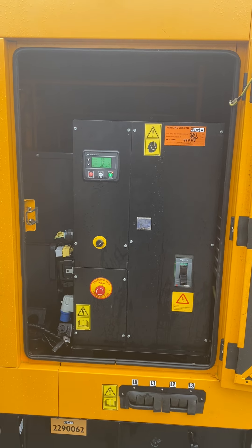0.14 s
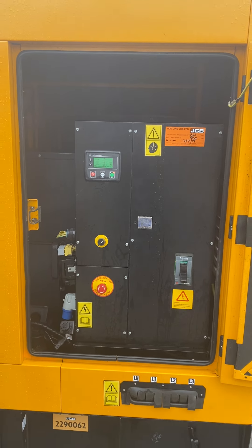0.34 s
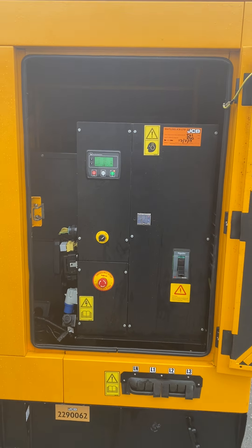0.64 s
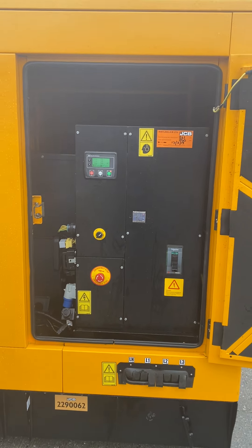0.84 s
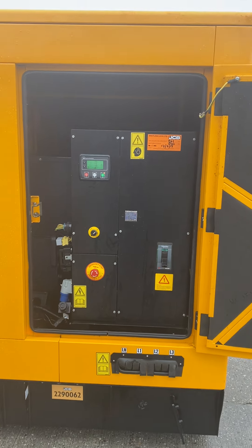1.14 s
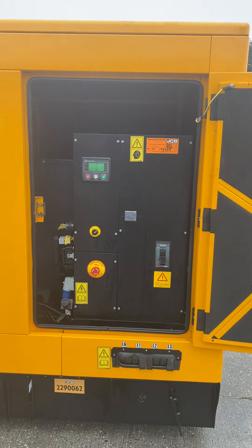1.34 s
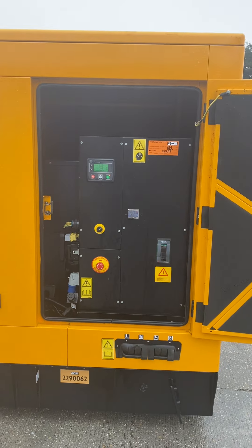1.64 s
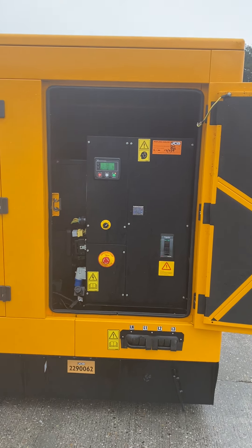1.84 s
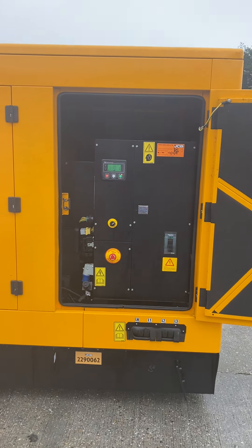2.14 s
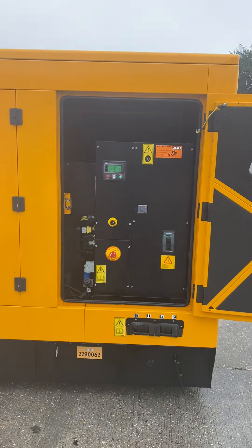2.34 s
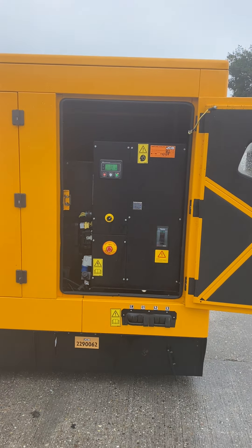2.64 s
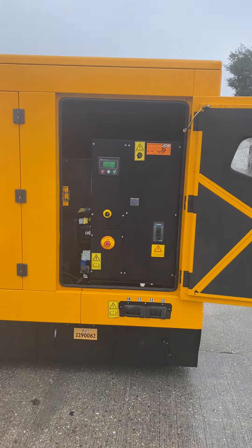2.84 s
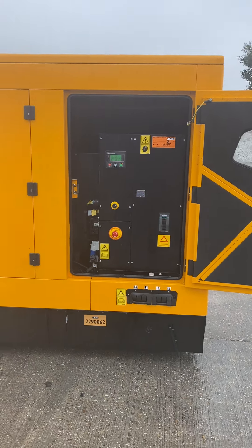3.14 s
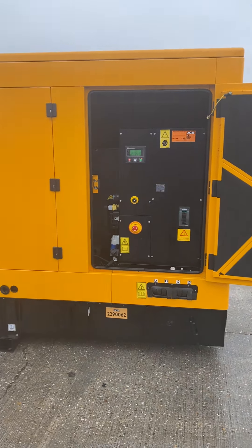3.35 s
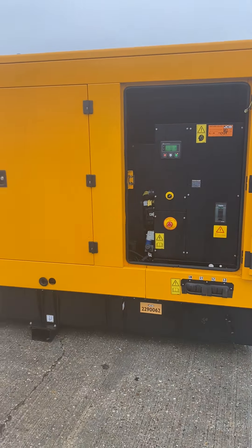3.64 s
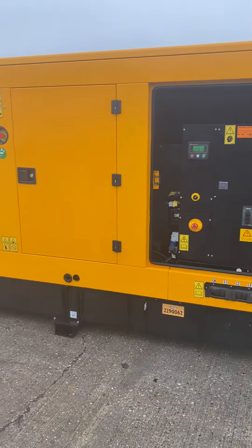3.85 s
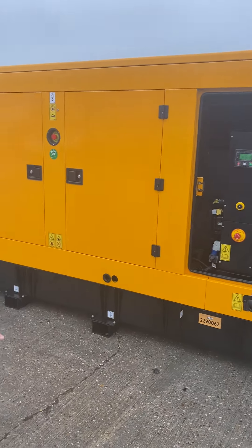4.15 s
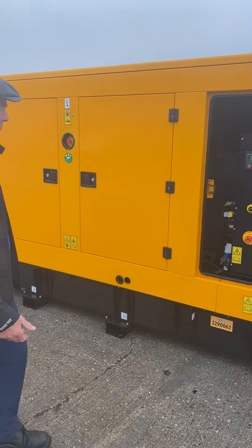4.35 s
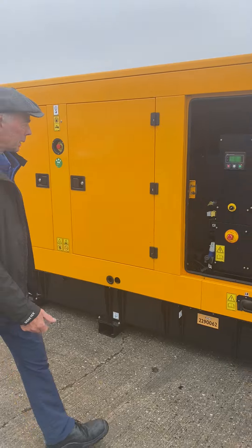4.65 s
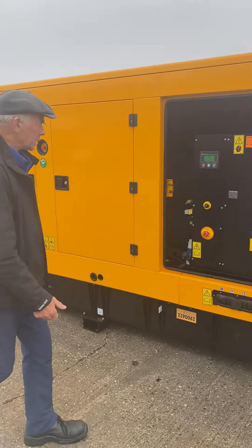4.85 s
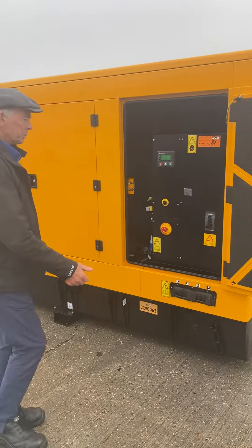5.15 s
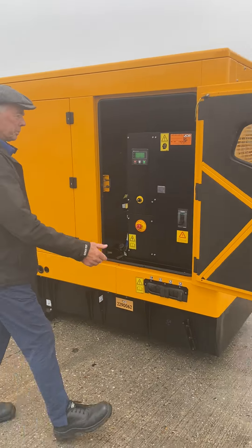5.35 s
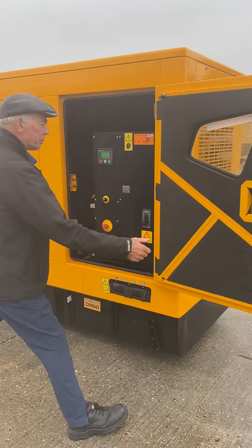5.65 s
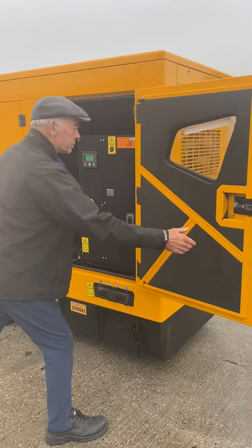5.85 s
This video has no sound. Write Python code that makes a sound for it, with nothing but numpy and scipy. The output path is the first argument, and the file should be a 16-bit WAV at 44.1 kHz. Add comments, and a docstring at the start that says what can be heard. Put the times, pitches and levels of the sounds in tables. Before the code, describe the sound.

A large diesel generator, just started, throbs, clatters and rings in its steel cabinet, then runs steadily and softens as the microphone backs away.

```python
"""A six-cylinder diesel generator, just fired up in its steel enclosure, throbs a few times and settles near 1500 rpm.
Cycle-repeating noise impacts make the injector and valve clatter; firing blows ring narrow cabinet bands.
Sine lines make the exhaust and fan hum and singing panels; shaped noise makes the air, hiss and turbo whistle.
The phone, held close at the open service door, backs about 2 m into the yard and moves sideways.
Decaying sines make a few dull handling knocks; short noise swells make the brushes and puffs."""
import sys
import numpy as np
from scipy import signal
from scipy.fft import rfft, irfft
from scipy.io import wavfile
from scipy.ndimage import uniform_filter1d

SR = 44100
rng = np.random.default_rng(int(sys.argv[2]) if len(sys.argv) > 2 else 0)


def waveform_to_disk(signal):
    """Save audio, clipped to [-1, 1], as 16-bit WAV at the path in sys.argv[1]."""
    frames = np.transpose(np.atleast_2d(signal))
    scaled = np.clip(frames, -1, 1) * 32767
    samples = np.round(scaled).astype(np.int16)
    wavfile.write(sys.argv[1], SR, samples)


N = 265041
TIME_S = np.arange(N) / SR
FREQ_HZ = np.maximum(np.arange(N // 2 + 1) * SR / N, 1)
LEFT_RIGHT = np.array([[1], [-1]])  # signs of the two microphone ports

# Engine: mean firing rate; a four-stroke cycle holds one firing of each cylinder
FIRING_HZ, CYLINDERS = 74.95, 6
# Relative knock of each cylinder in firing order: [level_db]
CYLINDER_DB = [4, -1.5, 3, 4, 0, -1]
# Throbs after the start: [peak_s, cabinet_gain_db, clatter_gain_db]; half-length to 1/e
SURGES = [(.052, 5, 5.5), (.207, 7.5, 5), (0.37, 6.5, 4), (0.531, 6, 2.5)]
SURGE_S = 0.028
# Share of the impacts that repeats every cycle (0-1), and how fast it grows
REPEAT_START, REPEAT_SETTLED, SETTLE_S = 0.05, 0.71, 0.7

# Walk from the service door: [time_s, back_m, side_m], side along the housing
WALK = [(0, 0, 0.34), (.5, 0.27, 0), (1.5, 0.58, 0.21), (2.2, 1.23, 0.74), (3.3, 1.83, 0),
        (4.2, 1.943, 0.16), (4.95, 2.03, 0.46), (5.4, 1.925, 1.04), (6, 2, 1.56)]
# Distance back where door sound gives way to yard sound, and the softness of that edge
YARD_FROM_M, YARD_EDGE_M = 1.394, 0.088

# Clatter spectrum at the door and in the yard, relative: [freq_hz, density_db_per_hz]
CLATTER_DOOR = [(500, -46), (950, 1.5), (1130, 1.5), (1230, -1.5), (1520, 0), (2050, 2), (2400, -8.5),
                (3000, -12), (3900, -10.5), (5000, -20.5), (7500, -21.5), (12000, -93)]
CLATTER_YARD = [(500, -36.5), (950, 4.5), (1200, 2.5), (1400, 2.5), (1900, 5), (2600, -2.5), (3400, -5),
                (3900, -5), (4900, -16), (6800, -11), (8500, -31), (12000, -107)]
# Engine cover modes against the clatter: [freq_hz, width_hz, door_db, yard_db]
COVERS = [(1555, 67, -6, -14.5), (2580, 39, 2, -17), (3240, 46, -11, -13), (3730, 340, -8.5, -33)]
# Scattered part of the clatter, different at the two ports: [freq_hz, share_0_to_1]
CLATTER_SCATTER = [(1200, .1), (2000, .19), (3500, .26)]
# Shading of the ports by the phone's body: [freq_hz, left_minus_right_db]
CLATTER_SHADE = [(1100, 1.6), (2000, 0.8), (4000, -0.5)]
# Clatter level over distance: [door_db, back_loss_db_per_m, yard_db, side_loss_db_per_m]
CLATTER_LEVEL = (-28.5, 12, -32.5, 4.6)
# Clatter left minus right: [door_db, back_loss_db_per_m, yard_db, side_loss_db_per_m]
CLATTER_PAN = (.3, .3, 2.2, 0.92)

# Cabinet modes, relative before the broad band shape: [freq_hz, width_hz, door_db, yard_db]
CABINET = [(794, 84, -0.5, -6.5), (849, 124, 4.5, 1), (1000, 76, -57, -12)]
# Cabinet level over distance: [door_db, back_loss_db_per_m, yard_db, side_loss_db_per_m]
CABINET_LEVEL = (-29.1, 6, -34.2, 3.9)
# Cabinet left minus right: [door_db, back_loss_db_per_m, yard_db, side_loss_db_per_m]
CABINET_PAN = (5, -1, 7.5, -0.5)
# Ground spot that changes the cabinet level around it: [back_m, side_m, width_m, gain_db]
RING_SPOT = (-3.7, 3.5, 2.5, -6)
# Left port's lead in the cabinet ring: at the door, and added well along the side in the yard
DOOR_TURN_RAD, SIDE_TURN_RAD = 0.14, 1
# Singing panels near the door, pitch taken to the nearest cycle multiple:
# [pitch_hz, peak_s, half_length_s, level_db]
PANELS_DOOR = [(749.4, 0.88, 0.5, -35.5), (766, 0.96, 0.25, -39), (738, 1.95, .4, -41),
               (812, 1.4, 1.2, -41), (825, .9, .7, -42), (852.5, 1.15, 0.7, -39.5), (848, 2.26, .3, -36.5),
               (875, 1.7, .9, -42)]
# Singing panels in the yard, pitch as above, relative: [pitch_hz, level_db]
PANELS_YARD = [(775, -4), (850, 5), (1000, -0.5), (1175, -3), (1275, -7), (1537.5, -0.5), (1575, -4.5),
               (1612.5, -6.5), (1687.5, -1.5), (1787.5, -8.5), (2337.5, -5)]
# Hard combustion knocks clanging the cabinet: [start_s, peak_db]
CLANGS = [(.047, -17), (.198, -24), (.228, -23), (.366, -24), (.686, -22), (.766, -31), (.999, -23),
          (1.079, -18), (1.319, -23.5), (1.356, -26), (1.4, -23), (1.867, -24), (1.978, -23), (2.261, -26)]
CLANG_HZ, CLANG_RISE_S, CLANG_DECAY_S = 811, 0.0051, 0.0034  # mean pitch, time constants
# Buzzing covers and ducts: [freq_hz, width_hz, peak_s, half_length_s, level_db]
BUZZES = [(350, 64, 0.082, 0.44, -38), (2607, 100, 0.11, 0.35, -41.5), (2600, 26, 1.3, 0.75, -51.5),
          (284, 38, 1.28, 0.23, -42.5), (1546, 59, 1.5, 0.33, -40), (1785, 320, 2.2, 0.88, -45.5),
          (635, 63, 3.34, 0.8, -44.5), (2970, 200, 4.5, 0.5, -46), (3310, 170, 5.06, 0.74, -47),
          (1850, 800, 4.9, .7, -40.5), (1598, 150, 5.6, 0.7, -44.5)]

# Exhaust and fan lines, pitch taken to the nearest cycle multiple, relative: [pitch_hz, level_db]
HUM = [(62.5, -10.5), (75, 1.5), (87.5, -6), (125, -10), (150, -11.5), (225, -18), (300, -17), (337.5, -16),
       (350, -8)]
# Hum booming and thinning along the walk: [time_s, level_db]
HUM_LEVEL = [(0, -47), (.25, -44), (1, -44.5), (1.4, -44), (2.3, -51), (2.7, -38), (3.05, -34),
             (3.5, -32.5), (3.8, -38.5), (4.15, -34.5), (4.5, -37), (5.2, -39), (5.55, -42.5), (5.9, -39.5)]
# Cooling-air spectrum at the door and in the yard, relative: [freq_hz, density_db_per_hz]
AIR_DOOR = [(25, -6), (55, 7.5), (100, 7.5), (220, 7), (340, 14), (420, 9), (500, -3), (680, 6.5),
            (1000, -91)]
AIR_YARD = [(25, -10), (55, 19), (105, 15), (200, 12.5), (340, 10), (470, 9.5), (600, 1), (750, 11),
            (1100, -73)]
# Air level over distance: [door_db, back_loss_db_per_m, yard_db, side_loss_db_per_m]
AIR_LEVEL = (-33, 12.5, -37.5, 4)
# Fan draught across the path: distance back, half-width to 1/e, peak level
DRAUGHT_M, DRAUGHT_WIDTH_M, DRAUGHT_DB = 1.637, 0.26, -31.5
# Turbocharger whistle along the walk: [time_s, level_db]
TURBO = [(0, -87), (2.5, -80), (2.8, -65), (3, -70), (3.3, -63.5), (4.05, -64.5), (4.4, -57.5), (4.8, -67),
         (5.2, -65), (6, -74)]
TURBO_HZ, TURBO_WIDTH_HZ = 5198, 38
# Hiss spectrum, relative: [freq_hz, density_db_per_hz]
HISS = [(3000, -25), (6500, -2), (9000, 1), (11000, -1), (12500, 3), (15500, 2.5)]
# Diffuse part of the hiss, different at the two ports: [freq_hz, share_0_to_1]
HISS_DIFFUSE = [(6500, .2), (8500, .004), (11300, .004), (12300, .3), (15500, .25)]
# Hiss level over distance: [door_db, back_loss_db_per_m, yard_db, side_loss_db_per_m]
HISS_LEVEL = (-47, 3.5, -52.5, -1)

# Knocks on the phone, levels before their envelopes: [start_s, ring_hz, ring_db, thud_db]
KNOCKS = [(3.856, 640, -7, -36), (3.864, 660, -18, -26), (4.0105, 735, -10, -30), (4.019, 625, -7, -25),
          (4.027, 726, -11.5, -29), (4.0363, 656, -9, -22), (4.129, 644, -19, -33), (4.142, 610, -14, -29),
          (4.1495, 630, -7.5, -17)]
KNOCK_GRIT_DB, KNOCK_TAIL_DB, KNOCK_TAIL_S = -14.5, -23, 0.0093  # levels against the ring
# Soft brushes and puffs on the phone: [peak_s, half_length_s, centre_hz, level_db]
SCUFFS = [(0.76, 0.0063, 13900, -53), (1.754, 0.03, 49.5, -41.5), (3.22, .15, 205, -35),
          (4.106, 0.11, 51, -43), (4.15, 0.02, 270, -32)]
# Microphone ports: right-port lag, band without lag, top cut
PORT_LAG_S, MONO_BELOW_HZ, TOP_HZ = 5.1e-5, 500, 15750


def clatter(cycle, place, repeat):
    """Injectors and valves ring the engine covers; part of it arrives scattered from the yard."""
    share = np.interp(FREQ_HZ, *np.transpose(CLATTER_SCATTER))
    direct = filtered(two_ports(rattle(cycle, repeat)), np.sqrt(1 - share))
    scattered = filtered(rng.standard_normal((2, N)), np.sqrt(share))
    ports = filtered(direct + scattered, shape(CLATTER_SHADE) ** (LEFT_RIGHT / 2))
    ports = ports * firings(cycle, decay=0.7, between=0.65) * undb(0.6 * walk(25))
    door_covers = sum(undb(db) * resonance(hz, width) for hz, width, db, _ in COVERS)
    yard_covers = sum(undb(db) * resonance(hz, width) for hz, width, _, db in COVERS)
    door = filtered(ports, shape(CLATTER_DOOR) * (1 + door_covers))
    yard = filtered(ports, shape(CLATTER_YARD) * (1 + yard_covers))
    return blend(unit(door), unit(yard), place)


def rattle(cycle, repeat, count=5):
    """A run of tiny impacts recurs every engine cycle, slowly changing, mixed with fresh ones."""
    size = int(SR * CYLINDERS / FIRING_HZ)
    patterns = rng.standard_normal((count, size))[:, (cycle % 1 * size).astype(int)]
    step = TIME_S / TIME_S[-1] * (count - 1)
    nearness = np.maximum(1 - abs(step - np.arange(count)[:, None]), 0)
    repeated = np.sum(patterns * np.sqrt(nearness), axis=0)
    return blend(rng.standard_normal(N), repeated, repeat)


def firings(cycle, decay, between):
    """Each cylinder's knock builds quickly and dies away over a steady level; decay is in firings."""
    count = cycle * CYLINDERS
    age = count % 1
    strength = undb(CYLINDER_DB)[count.astype(int) % CYLINDERS]
    return unit(between + strength * (1 - np.exp(-age / 0.22)) * np.exp(-age / decay))


def surges():
    """The first few throbs add decibels to the cabinet's ring and to the clatter."""
    peak_s, ring_db, clatter_db = np.transpose(SURGES)
    swells = passing(peak_s[:, None], SURGE_S)
    return ring_db @ swells, clatter_db @ swells


def cabinet(cycle, place, repeat):
    """Every firing rings the enclosure in a narrow band; in the yard its panels sing along."""
    drive = blend(rattle(cycle, repeat), strokes(cycle, repeat), .5)
    ports = drive + undb(-18.0) * LEFT_RIGHT * rattle(cycle, repeat)
    band = shape([(450, -27), (640, -20.5), (730, 13.0), (900, 4.5), (1400, -42.0)])
    door_modes = sum(undb(db) * abs(resonance(hz, width)) for hz, width, db, _ in CABINET)
    yard_modes = sum(undb(db) * abs(resonance(hz, width)) for hz, width, _, db in CABINET)
    door = unit(filtered(ports, band * door_modes))
    yard = unit(filtered(ports, band * yard_modes))
    panels = tones(cycle, PANELS_YARD, waver_db=2.0, spread=0.65)
    return blend(door, blend(yard, panels, 0.75 * repeat), place)


def strokes(cycle, repeat):
    """One block blow per firing; its timing scatter shrinks as the engine settles."""
    count = (cycle * CYLINDERS).astype(int)
    at = np.flatnonzero(np.diff(count))
    late, size_db = rng.standard_normal((len(at), 2)).T
    jitter_s = .0004 * (1 - repeat[at])
    hit = np.clip(at + (late * jitter_s * SR).astype(int), 0, N - 1)
    cylinder_db = .5 * np.array(CYLINDER_DB)[count[at] % CYLINDERS]  # half the knock's contrast
    out = np.zeros(N)
    out[hit] = undb(cylinder_db + size_db)
    return unit(out)


def door_panels(cycle):
    """Panel tones waver and take over from each other as the phone moves through standing waves."""
    out = 0
    for hz, peak_s, length_s, db in PANELS_DOOR:
        tone = tones(cycle, [(hz, 0)], waver_db=1.6, spread=0.2)
        out = out + tone * undb(db + 2.2 * walk(45)) * passing(peak_s, length_s)
    return out


def clangs():
    """Now and then a cold cylinder fires hard and the cabinet rings as a short decaying sine."""
    out = np.zeros(N)
    for start_s, db in CLANGS:
        age_s = np.maximum(TIME_S - start_s, 0)
        hz = CLANG_HZ * (1 + 0.022 * rng.standard_normal())
        envelope = (1 - np.exp(-age_s / CLANG_RISE_S)) ** 2 * np.exp(-age_s / CLANG_DECAY_S)
        out += undb(db) * envelope / envelope.max() * np.sin(2 * np.pi * hz * age_s)
    return out


def buzzes(cycle):
    """Loose covers and ducts chatter on every turn of the crankshaft, each in its own band."""
    turn = 2 * cycle % 1
    chatter = rattle(cycle, .55) * (.3 + np.exp(-turn / .2))
    out = 0
    for hz, width_hz, peak_s, length_s, db in BUZZES:
        buzz = unit(filtered(chatter, resonance(hz, width_hz) ** 2))
        out = out + buzz * undb(db) * passing(peak_s, length_s)
    return out


def hum(cycle):
    """Silenced exhaust and fan sound as lines on multiples of the engine cycle."""
    return tones(cycle, HUM, waver_db=1.0, spread=0) * undb(curves(HUM_LEVEL)[0])


def tones(cycle, rows, waver_db, spread):
    """Lines locked to the engine cycle waver in level; spread lets their phase drift between ports."""
    out = 0
    for hz, db in rows:
        multiple = np.round(hz * CYLINDERS / FIRING_HZ)
        phase = 2 * np.pi * (multiple * cycle + rng.random()) + spread * walk(0.79) * LEFT_RIGHT
        out = out + undb(db + waver_db * walk(4.29)) * np.sin(phase)
    return unit(out)


def cooling_air(cycle, place):
    """The fan's turbulent rush is low-frequency noise that partly repeats with the engine cycle."""
    flow = rattle(cycle, 0.23) * undb(0.2 * walk(11))
    door = unit(filtered(flow, shape(AIR_DOOR)))
    yard = unit(filtered(flow, shape(AIR_YARD)))
    return blend(door, yard, place)


def draught(back_m):
    """The cooling air roars for a moment where the phone passes through it."""
    roar = shape([(70, -28.5), (130, 5), (220, 10.5), (330, 12.5), (440, -2), (650, -88)])
    inside = np.exp(-((back_m - DRAUGHT_M) / DRAUGHT_WIDTH_M) ** 2)
    return unit(filtered(rng.standard_normal(N), roar)) * inside * undb(DRAUGHT_DB)


def turbo():
    """The turbocharger's thin, breathy whistle is narrow-band noise that comes and goes."""
    whistle = unit(filtered(rng.standard_normal(N), resonance(TURBO_HZ, TURBO_WIDTH_HZ) ** 2))
    return whistle * undb(curves(TURBO)[0])


def hiss(cycle):
    """Fine hiss pulses lightly with the firings, partly direct and partly diffuse."""
    share = np.interp(FREQ_HZ, *np.transpose(HISS_DIFFUSE))
    direct = lagged(filtered(rng.standard_normal(N), shape(HISS) * np.sqrt(1 - share)))
    diffuse = filtered(rng.standard_normal((2, N)), shape(HISS) * np.sqrt(share))
    return unit(direct + diffuse) * firings(cycle, decay=.4, between=1.3) * undb(1.1 * walk(23))


def handling():
    """Fingers knock the phone into a short gritty ring, faint tail and thud; brushes are noise swells."""
    out = np.zeros(N)
    grit = unit(filtered(rng.standard_normal(N), resonance(770, 310) ** 2))
    for start_s, hz, ring_db, thud_db in KNOCKS:
        age_s = np.maximum(TIME_S - start_s, 0)
        contact = np.exp(-age_s / .0022) - np.exp(-age_s / .0007)
        tone = np.sin(2 * np.pi * hz * age_s)
        ring = (tone + undb(KNOCK_GRIT_DB) * grit) * contact
        tail = undb(KNOCK_TAIL_DB) * tone * np.exp(-age_s / KNOCK_TAIL_S)
        thud = np.sin(2 * np.pi * 58 * age_s) * np.exp(-age_s / 0.0071)
        out += undb(ring_db) * (ring + tail) + undb(thud_db) * thud
    for peak_s, length_s, hz, db in SCUFFS:
        rub = unit(filtered(rng.standard_normal(N), resonance(hz, hz / 2) ** 2))
        out += rub * undb(db) * passing(peak_s, length_s)
    return out


def two_ports(x, count=7):
    """Reflections off doors and ground colour each port differently at every step of the walk."""
    knots_hz = np.arange(0, SR / 2, 170)
    depth = np.interp(knots_hz, [600, 1500, 3400, 5000], [.1, .35, .5, .25])

    def port_curves():
        draws = depth * rng.standard_normal((2, len(knots_hz)))
        return np.array([np.interp(FREQ_HZ, knots_hz, draw) for draw in draws])

    spectrum, out = rfft(lagged(x)), 0
    for step in range(count):
        turn, ripple = port_curves(), port_curves()
        nearness = np.maximum(1 - abs(TIME_S / TIME_S[-1] * (count - 1) - step), 0)
        out = out + nearness * irfft(spectrum * np.exp(.5 * ripple + 1j * turn), N)
    return out


def lagged(x):
    """Direct sound reaches the right port a moment after the left; the bass has no lag."""
    lag_s = PORT_LAG_S * (FREQ_HZ > MONO_BELOW_HZ)
    return filtered(x, np.exp(1j * np.pi * FREQ_HZ * lag_s * LEFT_RIGHT))


def turned(x, radians):
    """Let the left port lead the right by a changing phase."""
    return np.real(signal.hilbert(x) * np.exp(.5j * radians * LEFT_RIGHT))


def along_walk(rule, back_m, side_m, place):
    """Decibels follow distance back at the door, then distance sideways in the yard."""
    door_db, back_db_per_m, yard_db, side_db_per_m = rule
    return (1 - place) * (door_db - back_db_per_m * back_m) + place * (yard_db - side_db_per_m * side_m)


def spot(back_m, side_m, rule):
    """Decibels added, or taken away if negative, around one spot on the ground."""
    at_back_m, at_side_m, width_m, db = rule
    distance_squared = (back_m - at_back_m) ** 2 + (side_m - at_side_m) ** 2
    return db * np.exp(-distance_squared / width_m ** 2)


def passing(peak_s, length_s):
    """A smooth swell around one moment, down to 1/e at length_s on either side."""
    return np.exp(-((TIME_S - peak_s) / length_s) ** 2)


def walk(rate_hz):
    """Smoothed random steps wander slowly with a spread near 1."""
    hold = int(SR / rate_hz)
    held = np.repeat(rng.standard_normal(N // hold + 1), hold)
    return 1.29 * uniform_filter1d(uniform_filter1d(held, hold), hold)[:N]


def curves(rows):
    """Interpolate each column over time, one value a sample."""
    time_s, *columns = np.transpose(rows)
    return [np.interp(TIME_S, time_s, column) for column in columns]


def shape(points):
    """Gain per frequency, in straight decibel lines over log frequency."""
    hz, db = np.transpose(points)
    return undb(np.interp(np.log(FREQ_HZ), np.log(hz), db))


def resonance(hz, width_hz):
    """Response of one damped mode, 1 at its centre."""
    return 1 / (1 + 1j * (FREQ_HZ / hz - hz / FREQ_HZ) * hz / width_hz)


def filtered(x, response):
    """Pass a signal through a frequency response."""
    return irfft(rfft(x) * response, N)


def blend(a, b, share):
    """Equal-power mix from a (share 0) to b (share 1)."""
    share = np.clip(share, 0, 1)
    return np.sqrt(1 - share) * a + np.sqrt(share) * b


def undb(db):
    """Decibels to gain."""
    return 10 ** (np.asarray(db) / 20)


def unit(x):
    """Scale to rms 1."""
    return x / np.sqrt(np.mean(x ** 2))


def scene():
    """One crankshaft drives the cyclic parts; the walk sets how loud the machine is heard."""
    back_m, side_m = curves(WALK)
    place = .5 + .5 * np.tanh((back_m - YARD_FROM_M) / YARD_EDGE_M / 2)  # 0 at the door, 1 in the yard

    def heard(rule):
        return along_walk(rule, back_m, side_m, place)

    repeat = REPEAT_SETTLED + (REPEAT_START - REPEAT_SETTLED) * np.exp(-(TIME_S / SETTLE_S) ** 2)
    firing_hz = FIRING_HZ * (1 + 0.000393 * walk(3))  # slight speed wander
    cycle = np.cumsum(firing_hz) / CYLINDERS / SR + .2
    ring_surge_db, clatter_surge_db = surges()

    clatter_db = heard(CLATTER_LEVEL) + clatter_surge_db + LEFT_RIGHT * heard(CLATTER_PAN) / 2
    out = clatter(cycle, place, repeat) * undb(clatter_db)

    cabinet_db = heard(CABINET_LEVEL) + ring_surge_db + spot(back_m, side_m, RING_SPOT)
    ring = cabinet(cycle, place, repeat) * undb(cabinet_db) + door_panels(cycle) + clangs()
    turn_rad = DOOR_TURN_RAD + SIDE_TURN_RAD * place * np.tanh(2 * side_m)
    out += turned(ring, turn_rad) * undb(LEFT_RIGHT * heard(CABINET_PAN) / 2)

    out += lagged(buzzes(cycle) + turbo())
    out += hum(cycle)
    out += cooling_air(cycle, place) * undb(heard(AIR_LEVEL)) + draught(back_m)
    out += hiss(cycle) * undb(heard(HISS_LEVEL))
    return out + handling()


def record(dry):
    """The phone drops the deepest rumble and cuts the top."""
    low_cut = signal.butter(2, 30, "high", fs=SR, output="sos")
    top_cut = signal.ellip(10, .2, 80, TOP_HZ, fs=SR, output="sos")
    return signal.sosfilt(top_cut, signal.sosfilt(low_cut, dry))


dry = scene()
out = record(dry)
waveform_to_disk(out)
```